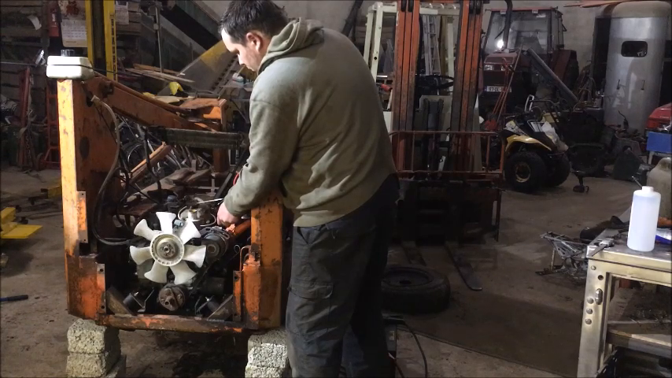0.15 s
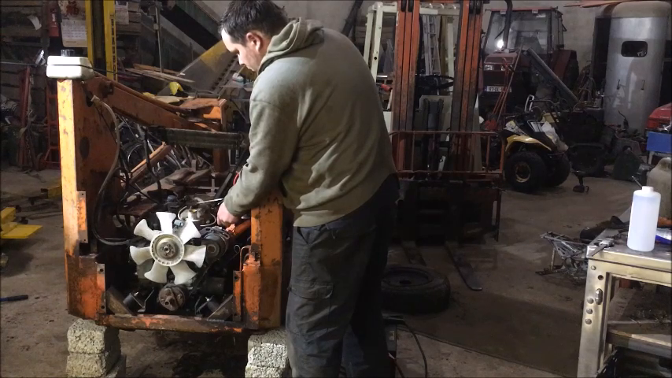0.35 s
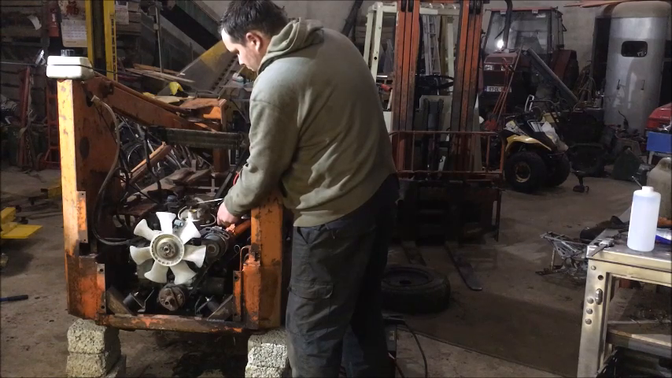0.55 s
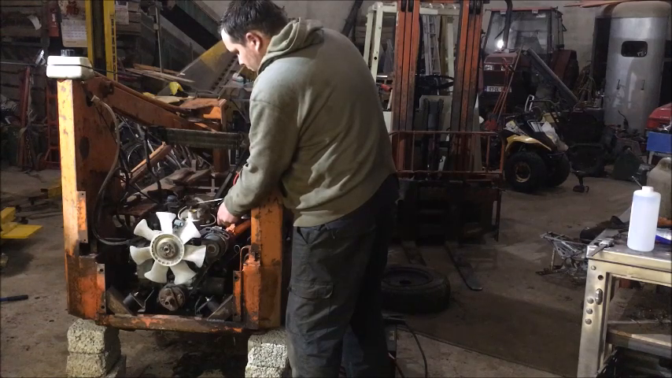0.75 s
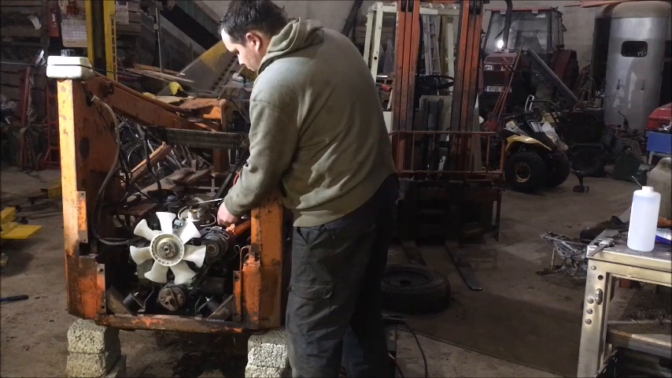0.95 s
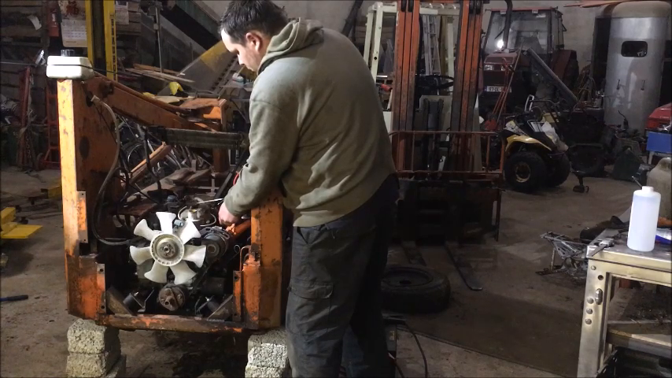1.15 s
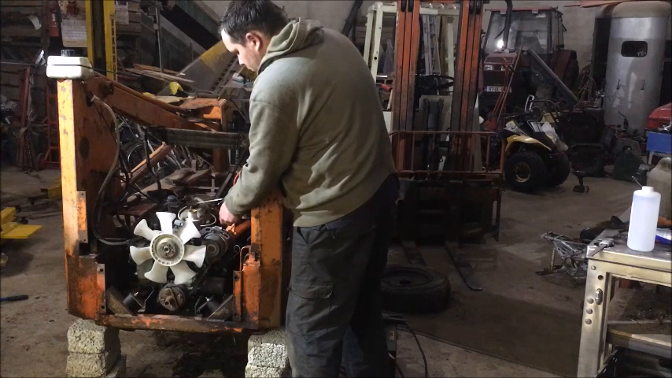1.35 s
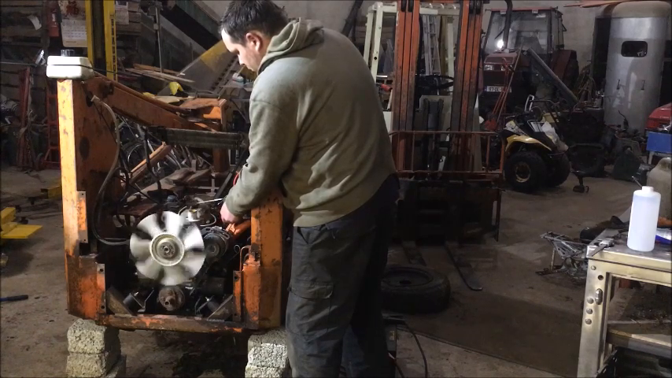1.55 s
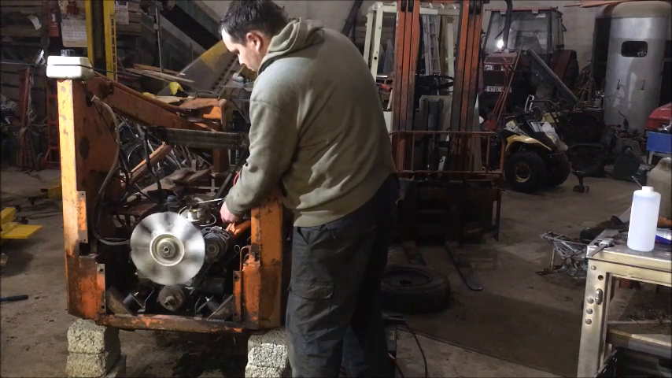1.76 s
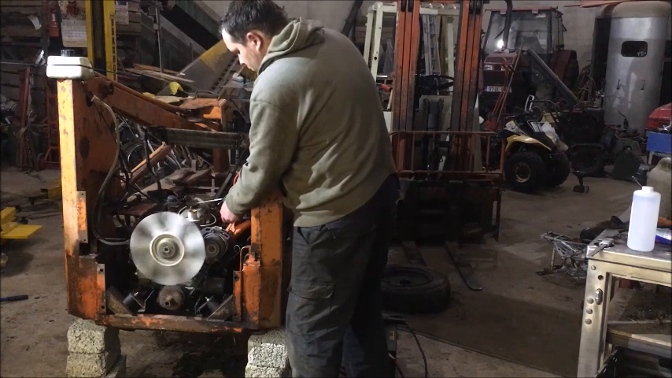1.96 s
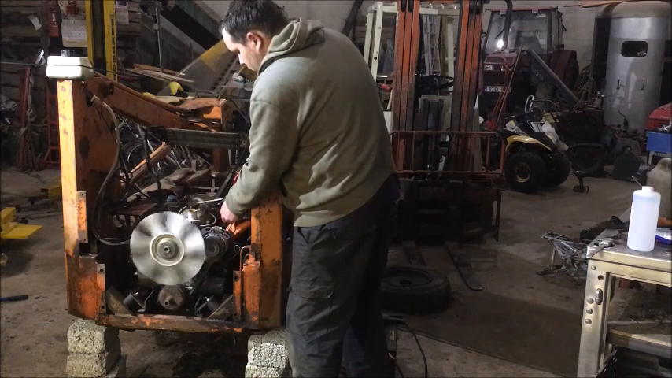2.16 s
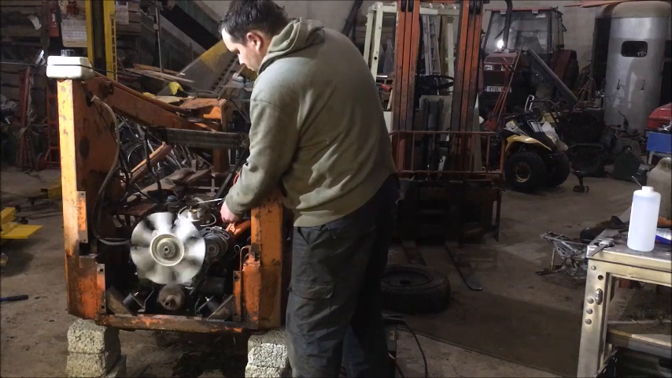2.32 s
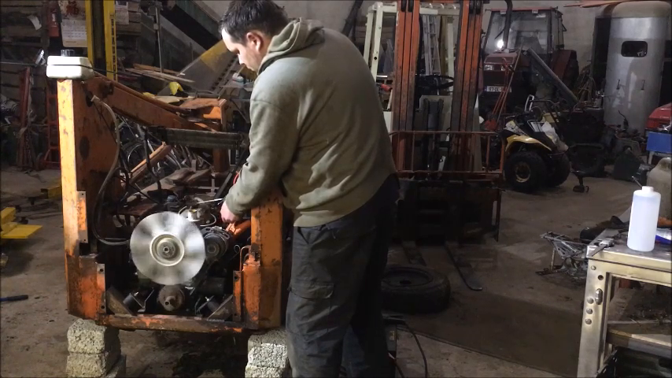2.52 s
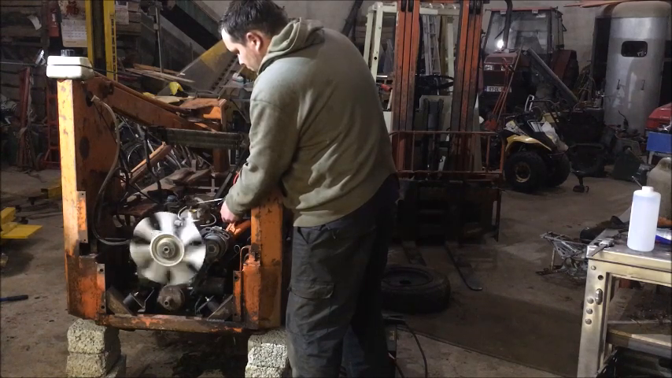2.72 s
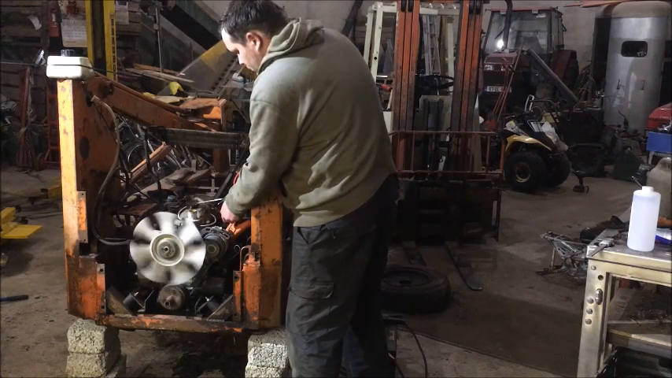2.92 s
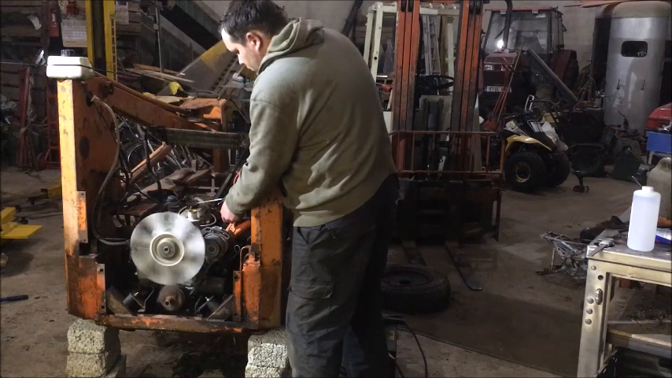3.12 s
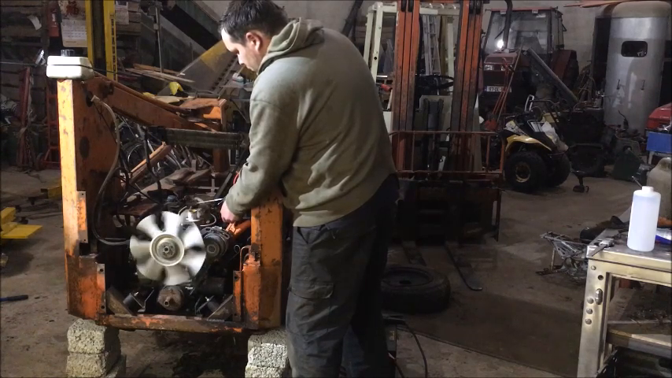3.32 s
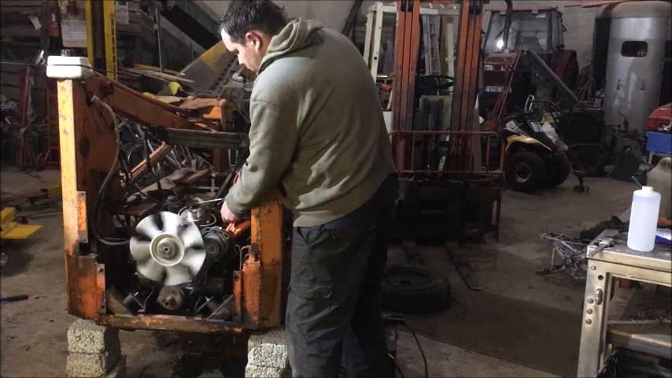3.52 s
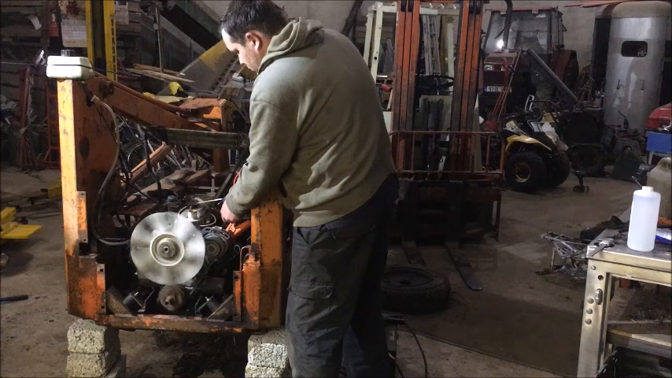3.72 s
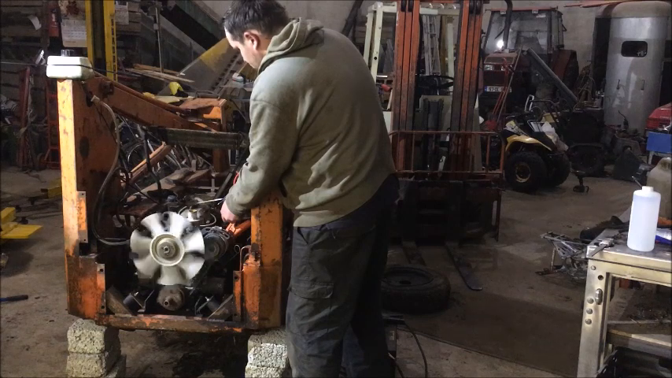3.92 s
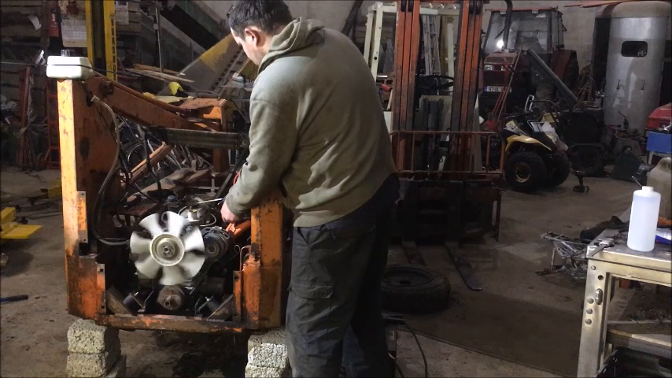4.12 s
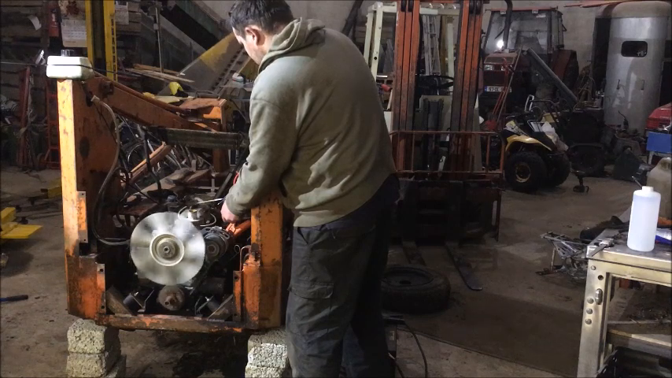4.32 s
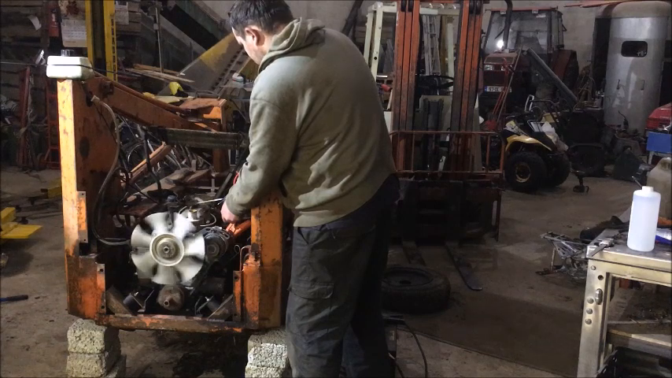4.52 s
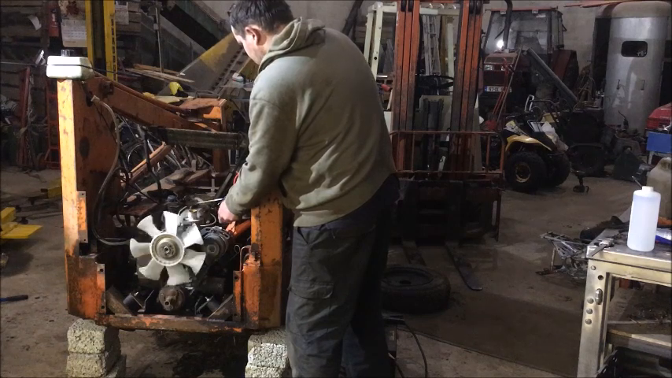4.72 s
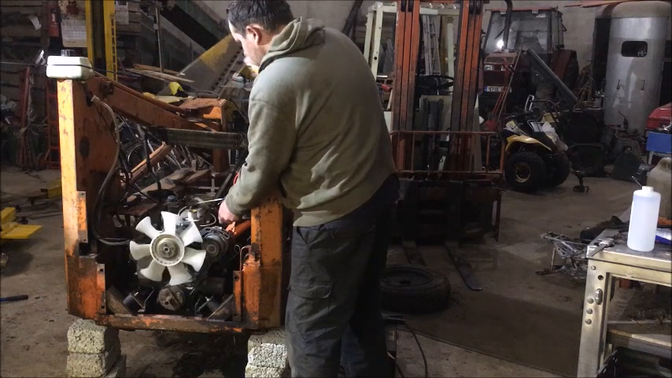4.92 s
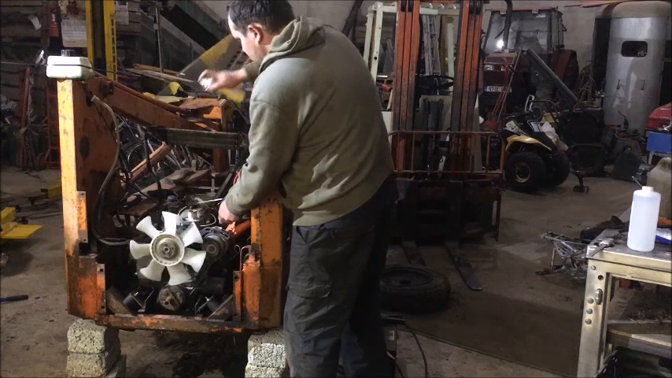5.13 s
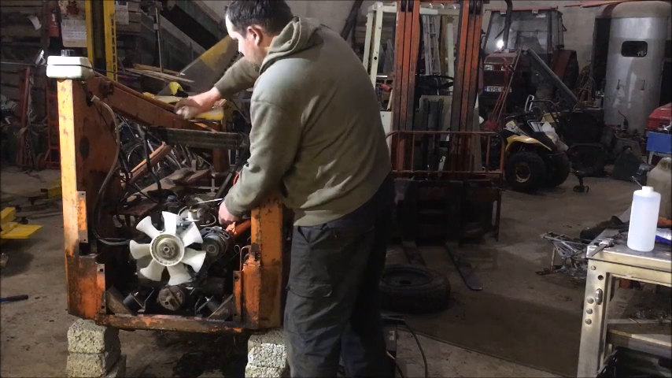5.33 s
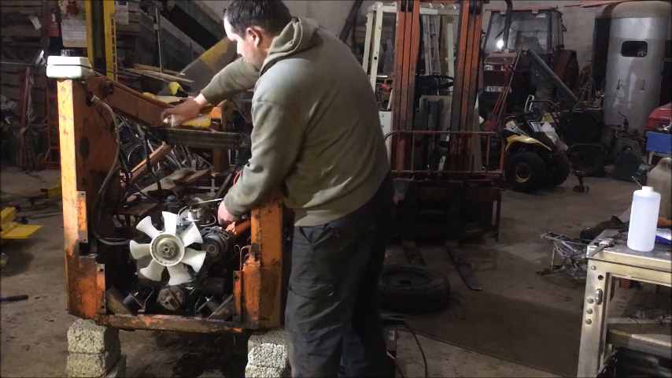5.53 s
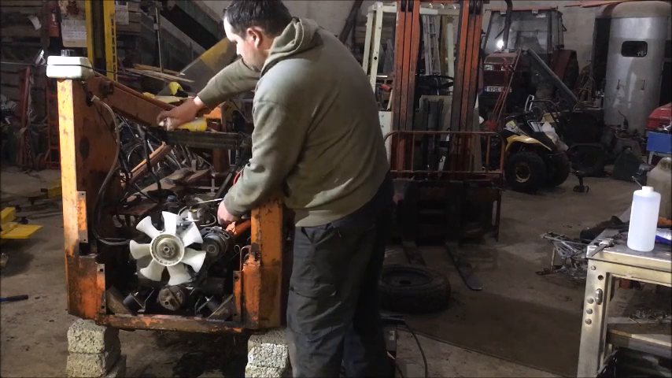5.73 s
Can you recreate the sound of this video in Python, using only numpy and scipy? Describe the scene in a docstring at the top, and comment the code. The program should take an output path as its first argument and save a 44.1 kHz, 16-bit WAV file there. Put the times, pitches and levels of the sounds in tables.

```python
"""Cold diesel cranked in a bare shed

The pinion clacks in and its teeth whine on the flywheel ring, as harmonics of a tooth rate that sags at each
compression; noise that jumps up with every tooth makes the grind, ring and hiss, and noise through the block's
resonances the groan. The exhaust puffs through a resonant pipe. The engine does not fire, the starter lets go
and the shed rings out.
One mono microphone: a distant rumble lies under it all, with faint hiss, crackle and ticks."""
import sys
import numpy as np
from scipy import signal
from scipy.fft import rfft, irfft, next_fast_len
from scipy.io import wavfile

SR = 44100
rng = np.random.default_rng(int(sys.argv[2]) if len(sys.argv) > 2 else 0)


def dump_mix(stems):
    """Bounce the given channels to the path in sys.argv[1] as a 16-bit WAV at rate SR."""
    frames = np.atleast_2d(stems).T  # one column per channel
    limited = np.clip(frames, -1, 1)  # hard clip at full scale
    pcm = np.round(limited * 32767).astype(np.int16)
    wavfile.write(sys.argv[1], SR, pcm)


N = 254456
TIME = np.arange(N) / SR   # s

# Engine cycles, each marked by its strongest exhaust puff: mark_s, bite_db (bite of the pinion)
CYCLES = [(1.936, -2), (2.55, -2.5), (3.152, 0), (3.759, 0), (4.367, -0.16)]
# Tooth rate over one cycle, two hard compressions and a free run: from_mark_s, tooth_rate_hz
CYCLE_SPEED = [(-.345, 391.9), (-.305, 365.8), (-.28, 401.2), (-.23, 421.7), (-.2, 413.1), (-.165, 345.3),
               (-.13, 330.6), (-.1, 375.3), (-.04, 402.3), (.05, 435), (.12, 468), (.16, 477.8),
               (.21, 474.7), (.235, 462.9)]
# Tooth rate as the starter gathers speed: time_s, tooth_rate_hz
SPIN_UP = [(1.619, 201), (1.71, 235.2), (1.769, 237.4), (1.8, 301), (1.84, 345), (1.881, 374.6),
           (1.929, 402.4)]
# Tooth rate as the starter lets go: time_s, tooth_rate_hz
RUN_DOWN = [(4.619, 457), (4.68, 381.2), (4.828, 221)]
# Top of each piston's squeeze: from_mark_s, load (0 to 1)
COMPRESSIONS = [(-.128, 0.87), (.04, 0.04), (0.302, .8)]
# How each layer obeys the cranking: level_db (at cruising speed), speed_db (per octave of tooth rate),
# load_db (at full load), load_rise_s (below zero: the load never tells), swell_db (take-up of the load),
# bite_share (of bite_db), breakaway_db (heavy start), fade_db_per_s (after letting go)
LAYER_LAWS = {"whine": (-30.5, 15.5, -13, 0.12, 3, 2.14, 8.5, 248),
              "groan": (-39, -11.5, 8.5, 0.1048, -4.5, 1.5, -6, 96.5),
              "grind": (-32, 5.5, -5, -0.11, 3.5, 0.98, 4, 72),
              "ring": (-33.5, 14, -9.5, 0.22, 6.5, -0.57, 6, 305.5),
              "hiss": (-35.5, 27.5, -14, 0.13, 3, -0.34, 14, 299.5)}
CRUISE_HZ = 420                             # tooth rate at which level_db holds
HOLD_S, RELEASE_S = 0.014, 0.027            # full load lasts, then the piston goes over the top
TAKE_UP_S, TAKE_UP_WIDTH_S = 0.088, 0.011   # lead of the take-up swell before each top, and its width
BREAKAWAY_S = 0.26                          # the crank is still heavy this long after the start
LET_GO_S = 4.668                            # the key is released
PINION_TEETH = 9

# Harmonics of the tooth whine: multiple of tooth rate, level_db
TOOTH_HARMONICS = [(1, -4), (2, 3), (3, 1.5), (4, -7), (5, -11), (6, -14)]
# What the bell housing passes of those harmonics: pitch_hz, width_hz, level_db
HOUSING_MODES = [(242, 39, 14.5), (325, 110, -2), (422.9, 102, -5.5), (723, 55, 0), (861.5, 85, -1.5),
                 (919.3, 84, -1), (1152, 180, -6.5), (1408.4, 88, -3), (1609, 112, 2.5), (1877.8, 54, -1),
                 (2013, 130, 1.5), (2367, 64, -3), (2710, 150, -6.5), (3140, 450, -8)]
# Resonances of the engine block: pitch_hz, width_hz, level_db
BLOCK_MODES = [(170, 14, -6), (244.9, 27, 0.5), (282.4, 42, 0), (354.6, 47.5, 0), (414, 67, -5.5),
               (497.5, 68, -11.5)]
# Resonances of the flywheel ring gear: pitch_hz, width_hz, level_db
RING_GEAR_MODES = [(2410, 44, -3.5), (2643, 48, 1), (3054, 61, -0.5), (4185, 44, 2), (4284, 120, -5),
                   (4570, 90, -4.5), (5140, 66, -1), (5600, 58, .4), (5846, 98, 0), (6410, 73, -2.5),
                   (6800, 82, -4), (7760, 65, 0), (9630, 74, -7), (9950, 46, -4), (11300, 71, -11),
                   (12080, 270, -8.5), (12960, 140, -11.5), (14400, 80, -15), (15000, 100, -18)]
# Spectrum of the grinding teeth: freq_hz, density_db (per Hz)
GRIND_SPECTRUM = [(60, -33), (120, -20), (250, 1), (430, -27), (560, -10), (680, -3.5), (850, -1),
                  (1300, -3), (1900, -4), (2250, -13), (3120, -10.5), (3890, -23.5), (5860, -18),
                  (8500, -28), (11000, -48.5)]
# Spectrum of the brush hiss: freq_hz, density_db (per Hz)
BRUSH_SPECTRUM = [(3530, -9.5), (6000, -18), (7320, -10.5), (7940, -28), (8360, -14.5), (9640, -11.5),
                  (12000, -13), (15800, -9)]

# Puff as the crank first moves: start_s, boom_db, overtone_db
FIRST_PUFF = (1.657, -36, -44)
# Exhaust puffs in every cycle: from_mark_s, boom_db, overtone_db
PUFFS = [(-.19, -37.5, -37), (0, -27.5, -31), (.095, -38, -46)]
# Boom of the exhaust pipe: pitch_hz, level_db, t60_s
PIPE_BOOM = [(74, 6, .085)]
# Overtones of the exhaust pipe: pitch_hz, level_db, t60_s
PIPE_OVERTONES = [(115, -5.5, .05), (166, 10, 0.11), (186.5, 4.5, 0.28)]

# Pinion and solenoid blows: start_s, level_db (before a common trim), treble_db, t60_s
CLACKS = [(1.592, -36.5, 9.5, .08), (1.605, -30, 14, 0.086), (1.61, -15, -11, .07),
          (1.6231, -15.5, 8.5, 0.092), (4.688, -33.5, 20, 0.022)]
# Spectrum of steel on steel: freq_hz, density_db (per Hz)
CLACK_SPECTRUM = [(88, -40), (150, -9.5), (919, -6), (1160, -12.5), (1590, 3), (2170, -11), (2680, -4),
                  (15800, -18.5)]

# Decay time of the shed: freq_hz, t60_s
SHED_DECAY = [(100, 0.37), (260, 0.65), (550, 1.4), (950, 1.03), (1840, 0.99), (4850, 1.19), (8000, .7),
              (12800, 0.33)]
# Echo level of the shed: freq_hz, level_db (against the direct sound)
SHED_LEVEL = [(60, -8), (300, -2), (2000, -6.5), (6000, -11.5), (14000, -27)]

# Spectrum of the distant rumble: freq_hz, density_db (per Hz)
RUMBLE_SPECTRUM = [(12, -57), (20, -42.5), (32, -22), (44, -4.5), (85, -0.5), (104, -6), (120, -12.5),
                   (265, -15), (517, -29.5), (653, -30), (1500, -42.5), (1950, -75.5), (3300, -120)]
# Level of the rumble before its slow drift: time_s, level_db
RUMBLE_LEVEL = [(0, -54), (.8, -56.5), (1.5, -52), (4.8, -54), (5.77, -47.5)]
# Spectrum of the microphone hiss: freq_hz, density_db (per Hz)
MIC_HISS_SPECTRUM = [(590, -38), (1000, -1.5), (1800, -0.5), (4190, -2.5), (4810, -10.5), (5590, -3),
                     (7720, -6), (9180, -1), (10400, -6.5), (12100, 1.5), (15800, -2)]
MIC_HISS_DB = -70.5
# Faint ticks: start_s, level_db (before a common lift and the band filter)
TICKS = [(0.267, -44), (0.565, -40.5), (0.836, -46), (1.077, -45), (1.3533, -45), (1.466, -45),
         (4.9177, -43), (5.0657, -44), (5.187, -53), (5.367, -40), (5.457, -51), (5.6658, -44)]
CUTOFF_HZ = 15740


def starter():
    """All that sounds while the pinion drives the flywheel: whine, groan, grind, ring and brush hiss."""
    hz, gain = cranking()
    hz = hz * (1 + 0.0045 * drift(25))
    passed = np.cumsum(hz) / SR                          # teeth passed so far
    wobble = np.sin(2 * np.pi * passed / PINION_TEETH)   # the pinion runs slightly out of true
    groan = resonate(rng.standard_normal(N) * from_db(1.5 * drift(30)), BLOCK_MODES)
    grind = colour(scuffing(passed, depth=0.9), GRIND_SPECTRUM)
    ring = resonate(scuffing(passed, depth=2.7), RING_GEAR_MODES)
    # the added first point keeps the hiss low below 3 kHz
    hiss = colour(scuffing(passed, depth=0.68), [(3000, -33.0)] + BRUSH_SPECTRUM)
    out = gain["whine"] * from_db(0.78 * wobble) * whine(hz, passed)
    out = out + gain["groan"] * groan
    out = out + gain["grind"] * grind
    out = out + gain["ring"] * from_db(0.15 * wobble) * ring
    return out + gain["hiss"] * from_db(0.53 * wobble) * hiss


def cranking():
    """Tooth rate, and each layer's gain from speed, compression load, bite, breaking away and letting go."""
    turns = [(mark + s, hz) for mark, _ in CYCLES for s, hz in CYCLE_SPEED if mark + s > SPIN_UP[-1][0]]
    s, hz = np.transpose(SPIN_UP + turns + RUN_DOWN)
    start, end = s[0], s[-1]
    hz = np.interp(TIME, s, hz)
    bite_db = np.interp(TIME, *np.transpose(CYCLES))
    on = np.clip((TIME - start) / 0.0081, 0, 1) * np.clip((end - TIME) / 0.0099, 0, 1)
    octaves = np.log2(hz / CRUISE_HZ)
    heavy = np.clip(1 - (TIME - start) / BREAKAWAY_S, 0, 1)
    since_let_go = np.maximum(TIME - LET_GO_S, 0)
    tops = [(mark + top, size) for mark, _ in CYCLES for top, size in COMPRESSIONS]
    # the teeth take up the load with a short swell before each top
    swell = sum(size * np.exp(-((TIME - top + TAKE_UP_S) / TAKE_UP_WIDTH_S) ** 2) for top, size in tops)
    gains = {}
    for name, (db, speed_db, load_db, rise, swell_db, share, heavy_db, fade_db) in LAYER_LAWS.items():
        # a negative rise puts the first point last, and the load then reads zero throughout
        knots = [-HOLD_S - rise, -HOLD_S, 0, RELEASE_S]
        load = sum(np.interp(TIME - top, knots, [0, size, size, 0]) for top, size in tops)
        level_db = db + speed_db * octaves + load_db * load + swell_db * swell
        level_db = level_db + share * bite_db + heavy_db * heavy - fade_db * since_let_go
        gains[name] = on * from_db(level_db)
    return hz, gains


def whine(hz, passed):
    """Harmonics of the tooth rate swell as they slide through the housing resonances."""
    out = 0
    for k, order_db in TOOTH_HARMONICS:
        k = round(k)
        power = 0
        for mid, width, db in HOUSING_MODES:
            power = power + from_db(2 * db) / (1 + (2 * (k * hz - mid) / width) ** 2) ** 2
        level = np.sqrt(2 * power) * from_db(order_db + 2.6 * drift(20))
        out = out + level * np.sin(2 * np.pi * (k * passed + rng.random()))
    return out


def scuffing(passed, depth):
    """Noise that jumps up with every passing tooth and sinks until the next, each burst louder or softer."""
    strength = from_db(rng.normal(0, 1.0, int(passed[-1]) + 1))[passed.astype(int)]
    return rng.standard_normal(N) * strength * np.exp(-depth * (passed % 1))


def exhaust():
    """A push of air, a moment after the valve lifts, sets the pipe booming for a few cycles."""
    puffs = [FIRST_PUFF] + [(mark + s, *db) for mark, _ in CYCLES for s, *db in PUFFS]
    start_s, boom_db, overtone_db = np.transpose(puffs)
    soft = np.hanning(round(0.0052 * SR))
    out = 0
    for modes, push_db in [(PIPE_BOOM, boom_db), (PIPE_OVERTONES, overtone_db)]:
        push = np.full(N, 1e-18)
        push[np.round((start_s + 0.013) * SR).astype(int)] = from_db(push_db)
        push = np.convolve(push, soft / soft.sum())[:N]
        for hz, db, t60 in modes:
            r, w = from_db(-60 / (t60 * SR)), 2 * np.pi * hz / SR
            out = out + from_db(db) * signal.lfilter([0, np.sin(w)], [1, -2 * r * np.cos(w), r * r], push)
    # an open pipe holds no steady pressure
    return signal.sosfilt(signal.butter(4, 52, "high", fs=SR, output="sos"), out)


def clacks():
    """Steel on steel: a broad rattle that dies in a few hundredths of a second."""
    rattle = colour(rng.standard_normal(N), CLACK_SPECTRUM)
    bright = signal.sosfilt(signal.butter(3, 9500, "high", fs=SR, output="sos"), rattle)
    out = 0
    for s, db, treble_db, t60 in CLACKS:
        attack = np.clip((TIME - s) / 0.00054, 0, 1)
        fade = attack * from_db(db - 4.5 - 60 * np.maximum(TIME - s, 0) / t60)
        out = out + fade * (rattle + (from_db(treble_db) - 1) * bright)
    return out


def shed(x):
    """Echoes of the bare shed as noise that dies band by band after a short gap."""
    t = np.arange(int(1.5 * SR)) / SR
    tail = 0
    edges = 45 * 2 ** np.arange(0, 8.6, 0.5)   # half-octave bands, Hz
    for low, high in zip(edges, edges[1:]):
        hz = np.sqrt(low * high)
        band_filter = signal.butter(2, [low, high], "band", fs=SR, output="sos")
        band = signal.sosfilt(band_filter, rng.standard_normal(len(t)))
        band = band * from_db(-60 * t / at_hz(SHED_DECAY, hz)) * np.clip((t - 0.008) / 0.0033, 0, 1)
        # energy in proportion to bandwidth, so the level table reads against the direct sound
        even = np.sqrt(2 * (high - low) / SR / np.sum(band ** 2))
        tail = tail + band * from_db(at_hz(SHED_LEVEL, hz)) * even
    return signal.fftconvolve(x, tail)[:N]


def quiet():
    """Distant rumble, microphone hiss with fine crackle and a few faint bright ticks."""
    rumble_db = np.interp(TIME, *np.transpose(RUMBLE_LEVEL)) + 0.47 * drift(2.9)
    rumble = colour(rng.standard_normal(N), RUMBLE_SPECTRUM) * from_db(rumble_db)
    hiss = colour(rng.standard_normal(N), MIC_HISS_SPECTRUM) * from_db(MIC_HISS_DB)
    clicks = (rng.random(N) < 20 / SR) * from_db(rng.normal(-55, 3, N))   # crackle, about 20 a second
    for s, db in TICKS:
        clicks[round(s * SR)] = from_db(db + 4.0)
    bright_band = signal.butter(2, [3500, 14000], "band", fs=SR, output="sos")
    return rumble + hiss + signal.sosfilt(bright_band, clicks)


def from_db(db):
    """Decibels to gain."""
    return 10 ** (np.asarray(db) / 20)


def rms_one(x):
    """Scale to unit rms."""
    return x / np.sqrt(np.mean(x ** 2) + 1e-20)


def at_hz(points, hz):
    """Read a table on a log frequency axis."""
    table_hz, values = np.array(points)[:, 0], np.array(points)[:, 1]
    return np.interp(np.log(np.maximum(hz, 1)), np.log(table_hz), values)


def colour(x, spectrum):
    """Give white input a spectrum; rms 1."""
    size = next_fast_len(len(x))
    gain = from_db(at_hz(spectrum, np.fft.rfftfreq(size, 1 / SR)))
    return rms_one(irfft(rfft(x, size) * gain, size)[:len(x)])


def resonate(x, peaks):
    """Parallel resonances with alternating signs; rms 1."""
    out = 0
    for k, (hz, width, db) in enumerate(peaks):
        r, w = np.exp(-np.pi * width / SR), 2 * np.pi * hz / SR
        mode = signal.lfilter([1 - r, 0, r - 1], [1, -2 * r * np.cos(w), r * r], x)
        out = out + (-1) ** k * from_db(db) * mode
    return rms_one(out)


def drift(rate):
    """Slow random wander of rms 1: smoothed noise at every 40th sample, joined by straight lines."""
    r = np.exp(-80 * np.pi * rate / SR)
    slow = signal.lfilter([1], [1, -2 * r, r * r], rng.standard_normal(N // 40 + 2002))[2000:]
    return np.interp(np.arange(N) / 40, np.arange(len(slow)), rms_one(slow))


def scene():
    """Engine and its echoes in the shed over the quiet floor, the same in both channels."""
    engine = starter() + exhaust() + clacks()
    return np.tile(engine + shed(engine) + quiet(), (2, 1))


def record(dry):
    """A steep low-pass cuts the top."""
    return signal.sosfilt(signal.ellip(16, 0.5, 80, CUTOFF_HZ, fs=SR, output="sos"), dry)


dry = scene()
out = record(dry)
dump_mix(out)
```